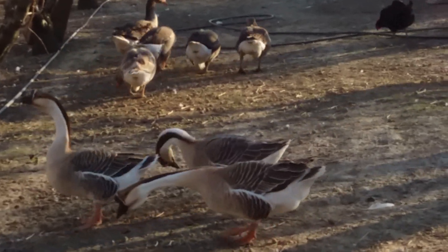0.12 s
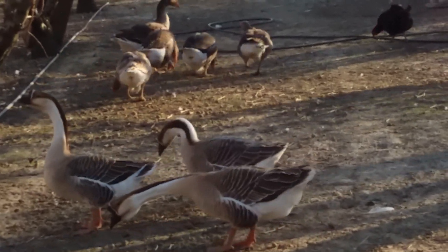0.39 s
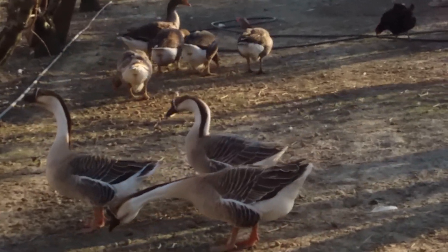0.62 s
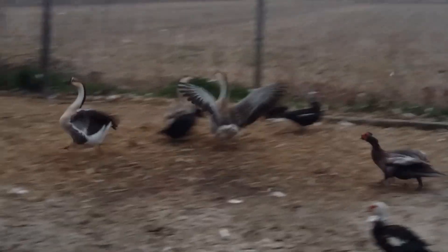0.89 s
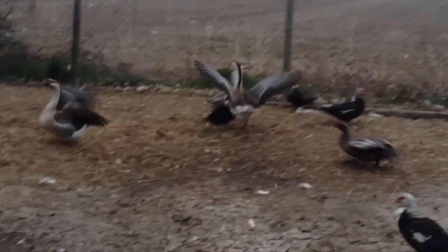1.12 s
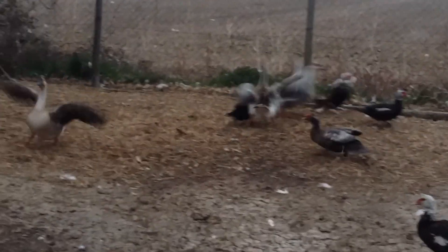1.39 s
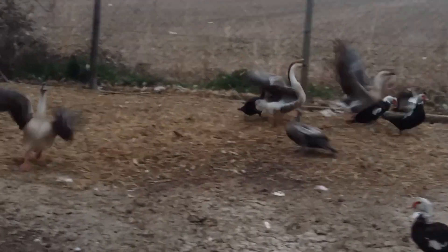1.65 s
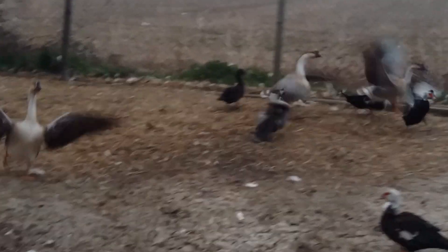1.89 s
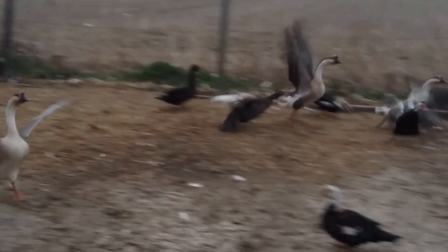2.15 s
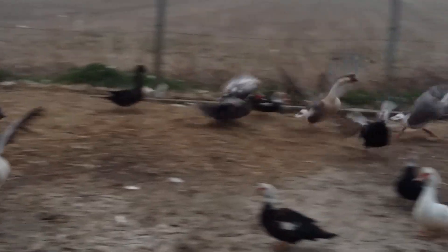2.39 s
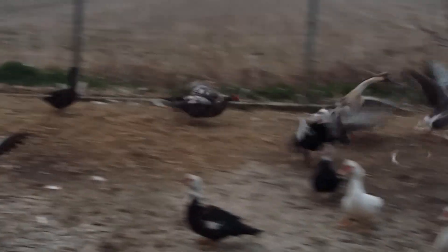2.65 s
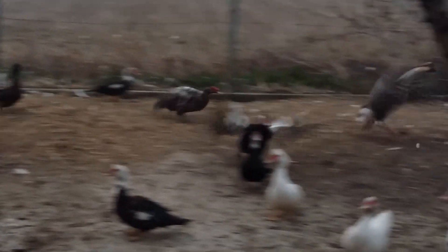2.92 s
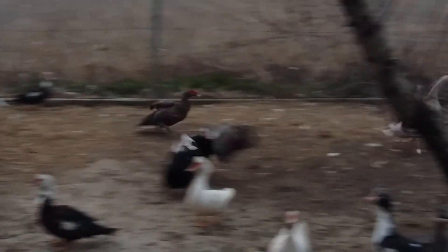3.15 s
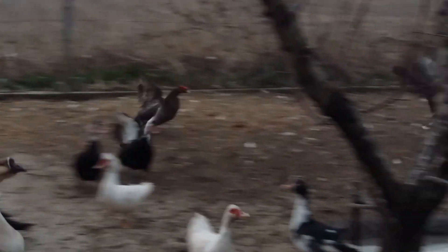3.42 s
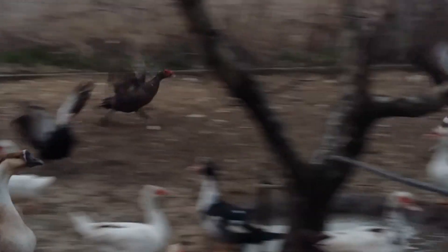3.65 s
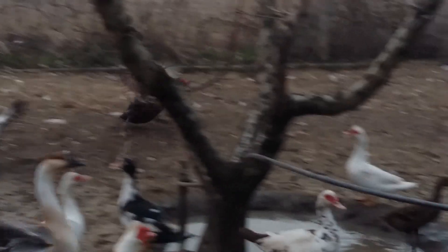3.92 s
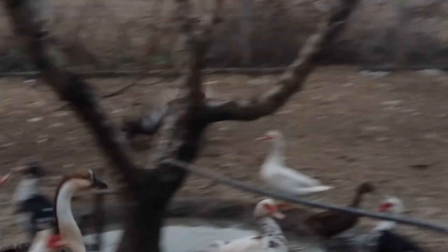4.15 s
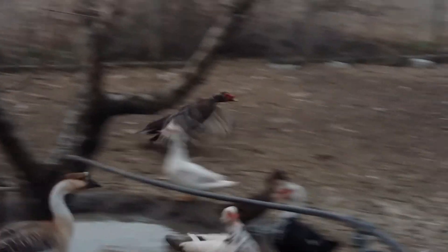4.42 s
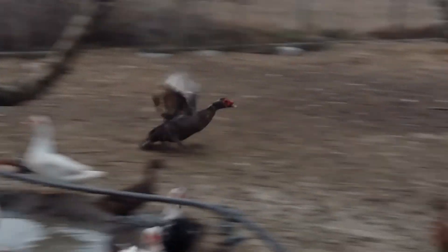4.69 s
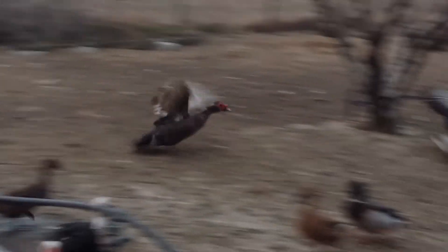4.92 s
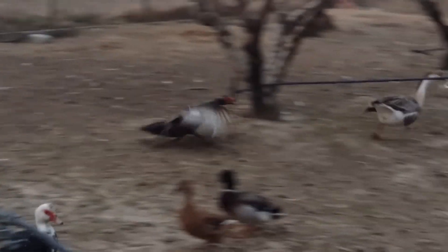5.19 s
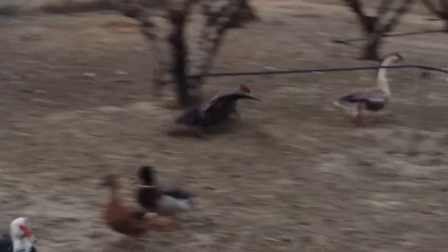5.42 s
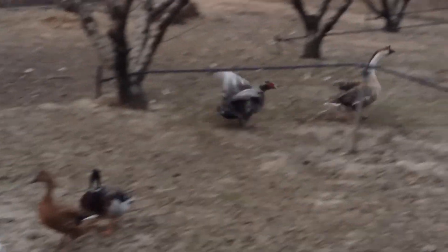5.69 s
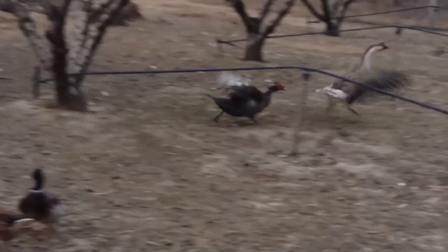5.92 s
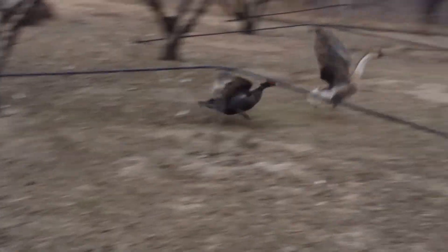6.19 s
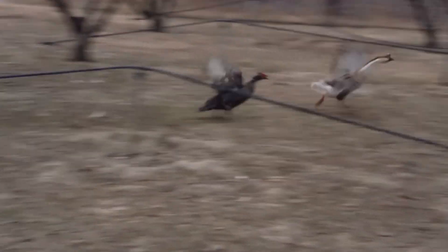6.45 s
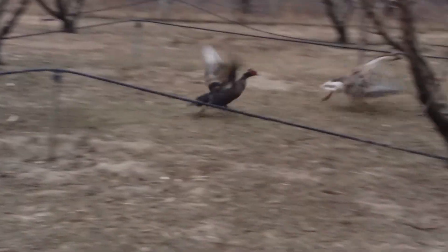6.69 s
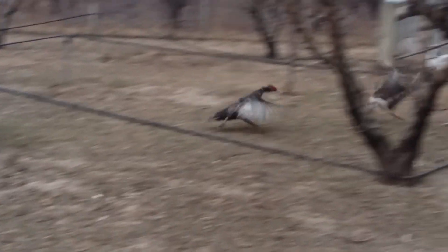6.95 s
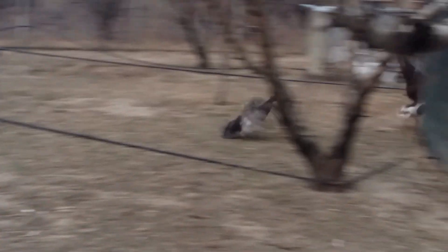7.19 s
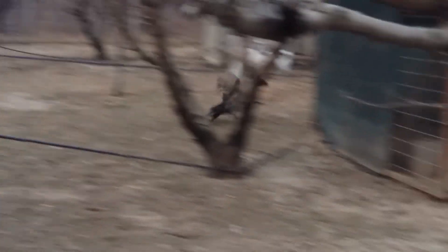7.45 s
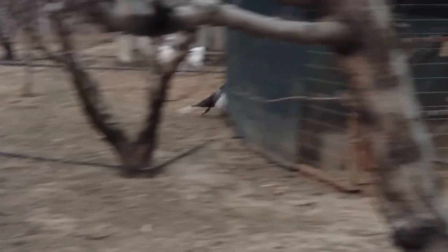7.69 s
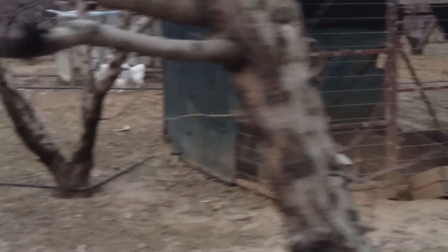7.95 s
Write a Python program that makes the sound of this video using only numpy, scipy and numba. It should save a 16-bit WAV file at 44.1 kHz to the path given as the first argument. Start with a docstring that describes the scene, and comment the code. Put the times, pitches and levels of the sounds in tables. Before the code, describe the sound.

An open farmyard with gusty low wind and soft hush. At 0 s a reedy cry fades into uneven nasal honks at 0.1 and 0.5 s, with thin whistled notes and a faint hoarse honk around 0.4. At about 0.8 s everything cuts to silence, fading back from 1.1 s. Hoarse low honks come at 1.2, 2.2 and, stronger, 3.2 s, with soft wing claps and foot thuds between. From 3.9 to 4.8 s honks crowd together, with faint high hissing bursts and a yodel at 4.8. Loud clear trumpet honks follow near 5.2, 5.7, 6.4 and 7.1 s, each flaring into a short harsh squawk; a piping note glides down at 5.6. Faint dry rasps sit behind, and a thud lands at 6.3. A last yodel and plain honk close around 7.7 to 8.1 s. The left is clear, the right muffled, with low hum until 1.9 s.

```python
"""Thin goose notes, a reedy cry and uneven reedy honks open an open farmyard, over wind and yard hush.
After a third of a second of silence the sound fades back in: hoarse honks overlap, wings and feet thud,
far rasps and thin bursts of high noise join, then clear trumpet honks close by, the first four squawking.
Honks are membrane flaps and breath ringing throat resonances; notes are sine partials; the rest is
shaped noise. Two microphone ports hear it all, the right one muffled."""
import sys
import numpy as np
from scipy import signal
from scipy.fft import rfft, irfft
from scipy.io import wavfile
from scipy.ndimage import uniform_filter1d, minimum_filter1d
from numba import njit

SR = 44100
rng = np.random.default_rng(int(sys.argv[2]) if len(sys.argv) > 2 else 0)


def to_wav(sig):
    """Store sig (one row per channel, or 1-D mono) as 16-bit WAV at the path in sys.argv[1].

    Samples outside -1..1 are clipped; the rate is SR.
    """
    pcm = np.clip(np.atleast_2d(sig), -1, 1) * 32767
    pcm = np.round(pcm).astype(np.int16)
    wavfile.write(sys.argv[1], SR, pcm.T)  # frames by channels


def volts_from_db(level):
    """Convert decibel levels to linear amplitude ratios."""
    exponent = np.asarray(level, float) / 20
    return 10 ** exponent


N = 356328  # samples


def shape(x, points):
    """Minimum-phase filter through (freq_hz, gain_db) points, so nothing sounds ahead of its cause."""
    hz, db = np.transpose(points)
    log_hz = np.log(np.arange(1025) * SR / 2048 + 1)
    cepstrum = irfft(np.interp(log_hz, np.log(hz), db) * np.log(10) / 20)
    # folding the cepstrum forward makes the filter causal
    cepstrum[1:1024] *= 2
    cepstrum[1025:] = 0
    response = irfft(np.exp(rfft(cepstrum)))[:1024]
    return signal.fftconvolve(x, response)[:len(x)]


def unit(x):
    """Scale to rms 1."""
    return x / np.sqrt(np.mean(x ** 2))


def band(x, lo_hz, hi_hz):
    """Steep band-pass."""
    return signal.sosfilt(signal.butter(3, [lo_hz, hi_hz], "band", fs=SR, output="sos"), x)


def walk(rate, size=N):
    """Random levels held 1 / rate s and slewed twice; spread near 1."""
    hold = int(SR / rate)
    steps = np.repeat(rng.standard_normal(size // hold + 1), hold)
    return 1.3 * uniform_filter1d(uniform_filter1d(steps, hold), hold)[:size]


@njit
def svf(x, hz, width):
    """Moving state-variable band-pass, gain 1 at the centre."""
    y, b, l = np.empty(len(x)), 0., 0.
    for i in range(len(x)):
        g, k = np.tan(np.pi * hz[i] / SR), width / hz[i]
        v = (b + g * (x[i] - l)) / (1 + g * (g + k))
        b, l, y[i] = 2 * v - b, l + 2 * g * v, k * v
    return y


def resonance(x, hz, width):
    """Moving throat or bill resonance: the band-pass run twice, at rms 1."""
    return unit(svf(svf(x, hz, width), hz, width))


FAINT_DB = -19.5  # fade at the start and end of a call


def course(length, attack_s, release_s, edge_s):
    """Place in the call -.5 to .5, fade in dB up from and back to faint, and soft ends."""
    t = np.arange(int(length * SR)) / SR
    rising = np.clip(1 - t / attack_s, 0, 1)
    falling = np.clip(1 - (length - t) / release_s, 0, 1)
    ends = np.clip(np.minimum(t, length - t) / edge_s, 0, 1)
    return t / length - .5, FAINT_DB * (rising + falling), ends


def even(s, length, db, hz, low_hz, high_hz, way):
    """Controls of a steady call: it swells in, settles on its pitch and resonances, sags and fades."""
    attack_s, release_s, sag_db, settle_s, *under = way
    u, fade_db, ends = course(length, attack_s, release_s, .0054)
    left = np.exp(-(u + .5) * length / settle_s)
    settling = [f * (1 - share * left) for f, share in zip((hz, low_hz, high_hz), under)]
    return (s, db + sag_db * u + fade_db, fade_db, *settling, ends)


def uneven(rows, high_hz):
    """Controls of a call read from its curve of start_s, pitch_hz, level_db and low_hz."""
    s, hz, db, low_hz = np.transpose(rows)
    length = s[-1] - s[0]
    u, _, ends = course(length, .01, .01, 0.016)
    now = s[0] + (u + .5) * length
    hz, db, low_hz = (np.interp(now, s, curve) for curve in (hz, db, low_hz))
    fade_db = np.minimum(db - np.median(db), 0)
    return s[0], db, fade_db, hz, low_hz, np.full(len(u), 1. * high_hz), ends


def flaps(phase, rough, chance, shimmer_db):
    """One click wherever the phase passes a whole number, shared between two samples, each of its own size."""
    out = np.zeros(len(phase) + 1)
    at = np.flatnonzero(np.diff(np.floor(phase)) > 0) + 1
    late = (phase[at] % 1) / (phase[at] - phase[at - 1])
    size = volts_from_db(shimmer_db * rough[at] * chance[at])
    out[at - 1] += size * late
    out[at] += size * (1 - late)
    return out[:-1]


HIGH_LINGERS, TREBLE_LINGERS = 0.28, 1  # share of the call's fade which each upper band escapes
YELP_S, YELP_WIDTH_S = .032, .014  # the high resonance flares soon after the onset
WAVER, WAVER_DB = .08, 6  # wander of throat resonances (share) and upper levels (dB) at full roughness
BILL_WIDTH_HZ = 800.
# treble colour of every honk: freq_hz [Hz], gain_db [dB, relative]
TREBLE_COLOUR = [(2500, -33.5), (3300, 16), (3700, 12), (4150, 1.5), (4700, -6.5), (5400, -4.5), (6200, -9),
                 (7000, -12), (8500, -22.5), (9500, -52), (12000, -45), (15700, -46.5)]


def honk(controls, bright, throat, voice, roughness, flap, gape_db=0):
    """Membrane flaps and puffs of air ring two moving throat resonances; rougher: more uneven, breathier."""
    weak, width, open_db, base_db = voice
    over_high_db, over_treble_db, bill, yelp_db, breath = bright
    held, onset, onset_s = roughness
    flap_size, flap_place = flap
    s, low_db, fade_db, hz, low_hz, high_hz, ends = controls
    n = len(hz)
    t = np.arange(n) / SR
    high_db = over_high_db + gape_db - HIGH_LINGERS * fade_db
    treble_db = over_treble_db + gape_db - TREBLE_LINGERS * fade_db
    high_db = high_db + yelp_db * np.exp(-((t - YELP_S) / YELP_WIDTH_S) ** 2)
    rough = held + onset * np.exp(-(t / onset_s) ** 2)
    low_hz, high_hz = (f * (1 + WAVER * held * walk(20, size=n)) for f in (low_hz, high_hz))
    high_db, treble_db = (db + WAVER_DB * held * walk(14.9, size=n) for db in (high_db, treble_db))
    phase = np.cumsum(hz * (1 + .06 * rough * walk(150, size=n))) / SR
    chance = rng.standard_normal((3, n))
    clicks = flaps(phase, rough, chance[0], 6)
    clicks += flap_size * flaps(phase + flap_place, rough, chance[1], 6)
    # strong-weak pairing of cycles comes and goes
    pairing = np.clip(weak * (1 + 0.12 * walk(25, size=n)), 0, .9)
    clicks *= 1 + pairing * np.sign(np.sin(np.pi * phase - 1))
    puffs = unit(chance[2] * np.exp(-(phase % 1) / 2.5))
    air = np.sqrt(1 - rough) * unit(clicks) + np.sqrt(rough) * puffs
    # the open throat adds a fixed colour to both resonances
    wide = shape(air, throat)
    low = resonance(air, low_hz, 1. * width) + volts_from_db(open_db) * unit(band(wide, 400, 1487))
    high = resonance(air, high_hz, 2.0 * width) + volts_from_db(open_db) * unit(band(wide, 1970, 3217))
    # the hiss of air shows most in the treble
    breathy = air + breath * (puffs + 0.2 * chance[2][::-1])
    bill_ring = resonance(breathy, np.full(n, 1. * bill), BILL_WIDTH_HZ)
    treble = unit(unit(shape(breathy, TREBLE_COLOUR)) + 0.95 * bill_ring)
    # the windpipe hums the fundamental cleanly under the honk
    base = volts_from_db(base_db) * np.sin(2 * np.pi * phase)
    upper = volts_from_db(high_db) * unit(high) + volts_from_db(treble_db) * treble
    return int(s * SR), ends * volts_from_db(low_db) * (unit(low) + upper + base)


# Settings of each kind of honk, beside its tables below:
# BRIGHT: high throat dB over low, treble dB over low, bill resonance Hz, early yelp dB, breath in the treble
# ROUGH: held roughness 0-1, extra at the onset 0-1, onset s
# FLAP: second flap within each cycle: size 0-1, place in the cycle 0-1
CLEAR_BRIGHT, CLEAR_ROUGH, CLEAR_FLAP = (5.5, -12.5, 3903.5, 4, 2.2), (.04, .55, .05), (.55, .478)
CLEAR_HIGH_HZ = 2400  # held high throat resonance
# clear honks: start_s [s], length_s [s], level_db [dB, relative], pitch_hz [Hz, held],
# low_hz [Hz, held low throat resonance]
CLEAR_HONKS = [(5.229, 0.24, -29, 172, 1233), (5.713, 0.23, -28, 173.9, 1250),
               (6.412, 0.23, -29.5, 173.2, 1245), (7.071, .335, -30.5, 171.6, 1246),
               (7.852, 0.26, -31.5, 171.3, 1228)]
# their open throat: freq_hz [Hz], gain_db [dB, relative]
CLEAR_THROAT = [(300, -26), (400, -38.5), (510, -10), (680, -15.5), (850, -2), (1350, -8), (1540, -9.5),
                (1700, 3.5), (2370, -12), (2610, 16), (3100, -4.5), (3500, -27.5), (5000, -64.5)]
# their voice: weak [0-1, every second cycle weaker], width_hz [Hz, resonance width],
# open_db [dB, open throat], base_db [dB, fundamental]
CLEAR_VOICE = (0.21, 191, 0.5, -19)
# their course: attack_s [s], release_s [s], sag_db [dB], settle_s [s], then how far under their held
# values the pitch, low and high resonance start [shares]
CLEAR_COURSE = (.025, .05, -2.3, .075, .065, -0.17, 0.342)


def clear_honks():
    """Trumpet honks close by: smooth flaps with a strong second flap drive steady, bright resonances."""
    return [honk(even(*row, CLEAR_HIGH_HZ, CLEAR_COURSE), CLEAR_BRIGHT, CLEAR_THROAT, CLEAR_VOICE,
                 CLEAR_ROUGH, CLEAR_FLAP) for row in CLEAR_HONKS]


SQUAWK_HZ, SQUAWK_UPPER_HZ, SQUAWK_UPPER_DB = 2400, 5600, -16.5
# the first four near honks break into a squawk, the last has none:
# start_s [s], length_s [s], level_db [dB, relative]
SQUAWKS = [(5.391, 0.096, -19), (5.885, 0.1, -18.5), (6.583, 0.084, -18.5), (7.333, 0.091, -18)]


def squawk(s, length, db):
    """The bill flies open: quick uneven flaps and breath in a main and a falling upper resonance."""
    n = int(length * SR)
    u = np.arange(n) / n
    chance = rng.standard_normal((2, n))
    phase = np.cumsum(340 * (1 + .15 * walk(300, size=n))) / SR
    air = unit(flaps(phase, np.ones(n), chance[0], 3) + .05 * chance[1])
    main = unit(band(air, SQUAWK_HZ - 300, SQUAWK_HZ + 450))
    falling_hz = SQUAWK_UPPER_HZ * (1 - 0.14 * u)
    upper = unit(svf(svf(air, falling_hz, 1200.0), falling_hz, 690.0)) + 0.33 * unit(band(air, 6500, 7600))
    # fast rise, slower fall
    envelope = volts_from_db(db - 33.0 * u ** 2) * np.minimum(u / 0.16, 1) * np.minimum((1 - u) / 0.23, 1)
    return int(s * SR), envelope * (main + volts_from_db(SQUAWK_UPPER_DB) * upper)


HOARSE_BRIGHT, HOARSE_ROUGH, HOARSE_FLAP = (-6.5, -21, 4399.5, -1.5, 1.5), (.26, .4, .04), (.15, .45)
HOARSE_HIGH_HZ = 1560
# hoarse honks, one curve each: start_s [s], pitch_hz [Hz], level_db [dB, relative],
# low_hz [Hz, low throat resonance]
HOARSE_HONKS = [
    [(.37, 171.3, -36, 910), (.42, 164.2, -39.5, 900), (.5, 167.7, -40.5, 950)],
    [(1.21, 160, -49, 1450), (1.258, 144.5, -42.5, 1270), (1.458, 164, -35, 1280),
     (1.502, 146.7, -36, 1300), (1.58, 159, -55, 1060)],
    [(2.19, 169.6, -51.5, 1150), (2.3, 144.7, -36.5, 1040), (2.428, 155.9, -35.5, 915),
     (2.556, 153.2, -34.5, 960), (2.61, 159, -54, 1230)],
    [(3.14, 159, -60, 1020), (3.16, 178.6, -34.5, 1020), (3.258, 178.4, -41.5, 1060),
     (3.29, 173.3, -36, 1570), (3.342, 147.1, -32, 1250), (3.618, 163.2, -26.5, 1273),
     (3.68, 175.9, -45, 1200)],
    [(3.9, 172.7, -40, 866), (3.93, 166, -35.5, 790), (4.01, 177, -32.5, 910), (4.06, 170, -59, 1200)],
    [(4.16, 148.2, -39.5, 1490), (4.208, 161.1, -30, 1620), (4.29, 154.4, -34, 1480),
     (4.384, 149.9, -28.5, 1310), (4.43, 151.3, -55, 880)],
    [(4.43, 166.5, -41, 780), (4.484, 147.2, -40, 800), (4.5, 158, -50, 910)],
    [(4.5, 153.3, -38, 990), (4.554, 180.8, -27, 1120), (4.708, 175, -39, 936), (4.772, 141.6, -35.5, 1040),
     (4.84, 156.4, -38.5, 1369)],
    [(5.53, 177, -46, 1340), (5.558, 166, -32, 1460), (5.62, 166.6, -42.5, 1500)],
]
# how wide the bill gapes in each hoarse honk: gape_db [dB on the upper bands]
GAPES = [5, 2, 2.5, -2, 1.5, 0.5, 3.5, 2, 2.5]
# their open throat: freq_hz [Hz], gain_db [dB, relative]
HOARSE_THROAT = [(300, -51), (450, -19.5), (700, -0.5), (1070, 0), (1650, 1.5), (2300, -12), (2750, -1),
                 (3300, -49.5), (5000, -75)]
# their voice: weak [0-1], width_hz [Hz], open_db [dB], base_db [dB]
HOARSE_VOICE = (0.2, 203, -2, -13.5)


def hoarse_honks():
    """Uneven flaps and much breath; pitch, level and throat follow a curve."""
    return [honk(uneven(rows, HOARSE_HIGH_HZ), HOARSE_BRIGHT, HOARSE_THROAT, HOARSE_VOICE,
                 HOARSE_ROUGH, HOARSE_FLAP, gape_db) for rows, gape_db in zip(HOARSE_HONKS, GAPES)]


REEDY_BRIGHT, REEDY_HIGH_HZ = (-9, -14, 3201.5, 1.5, 2.5), 1640
# reedy honks, one curve each: start_s [s], pitch_hz [Hz], level_db [dB, relative],
# low_hz [Hz, low throat resonance]
REEDY_HONKS = [
    [(.12, 169.1, -50, 1260), (.158, 163.2, -32, 1180), (.192, 171.3, -32.5, 1044),
     (.346, 166.2, -29.5, 893), (.38, 164, -46, 1040)],
    [(.49, 167.6, -40.5, 1010), (.59, 167, -31, 1050), (.68, 167, -34, 992), (.75, 160.1, -43, 980),
     (.78, 157, -60.5, 1036)],
]
# their open throat: freq_hz [Hz], gain_db [dB, relative]
REEDY_THROAT = [(300, -40.5), (500, -16), (840, -17), (1000, -7.5), (1350, -4), (1700, 10), (2100, -23),
                (2700, -4.5), (3300, -38), (5000, -49.5)]
# their voice: weak [0-1], width_hz [Hz], open_db [dB], base_db [dB]
REEDY_VOICE = (0.22, 188, 1.5, -22)


def reedy_honks():
    """Uneven curves as in the hoarse honks, with the low held roughness of the clear ones."""
    return [honk(uneven(rows, REEDY_HIGH_HZ), REEDY_BRIGHT, REEDY_THROAT, REEDY_VOICE,
                 CLEAR_ROUGH, HOARSE_FLAP) for rows in REEDY_HONKS]


def note(s, hz, multiples, levels, ends):
    """A nearly pure call: a few strong partials of one wavering pitch, faint others, a husky flutter on all."""
    n = len(hz)
    phase = 2 * np.pi * np.cumsum(hz * (1 + .003 * walk(60, size=n))) / SR
    strong = sum(volts_from_db(db) * np.sin(k * phase) for k, db in zip(multiples, levels))
    others = [k for k in range(2, int(6500 / hz.max())) if k not in multiples and k * hz.min() > 600]
    overtones = sum(volts_from_db(-6 * k * hz / 1000 + 6 * walk(25, size=n)) * np.sin(k * phase) for k in others)
    # air leaks past the membranes once a cycle
    leak = rng.standard_normal(n) * (1 + np.sin(phase))
    breath = unit(shape(leak, HOARSE_THROAT[:-1] + TREBLE_COLOUR[-1:]))
    faint = volts_from_db(np.max(levels, axis=0) - 16.5) * (overtones + 0.46 * breath)
    flutter = 1 + 0.18 * walk(380, size=n)
    return int(s * SR), ends * np.sqrt(2) * (strong + faint) * flutter


NOTE_ATTACK, NOTE_RELEASE = 0.46, 0.74  # shares of the length
# partials of a thin note: multiple [of the pitch], level_db [dB, relative]
NOTE_PARTIALS = [(1, 0), (2, -18), (3, -28)]
# thin notes: start_s [s], length_s [s], level_db [dB, relative], from_hz [Hz], to_hz [Hz]
THIN_NOTES = [(.42, .11, -28, 1010, 985), (.385, .09, -31, 840, 880), (3.22, .055, -26, 1090, 1085),
              (3.912, .13, -29, 850, 875), (3.99, .08, -31, 1310, 1290), (5.565, .175, -19, 1495, 1410),
              (5.6, .12, -42, 2310, 2230), (5.55, .15, -33, 845, 805)]


def thin(s, length, db, from_hz, to_hz):
    """One gliding tone that swells and fades roundly."""
    u, fade_db, ends = course(length, NOTE_ATTACK * length, NOTE_RELEASE * length, .012)
    multiples, partial_db = zip(*NOTE_PARTIALS)
    round_db = db + fade_db ** 2 / FAINT_DB
    pitch = from_hz + (to_hz - from_hz) * (u + .5) ** 1.5
    return note(s, pitch, multiples, [round_db + p for p in partial_db], ends)


YODEL_FROM_HZ, YODEL_TO_HZ, YODEL_CLIMB_S, YODEL_WIDTH_HZ = 850, 1400, .045, 150
YODEL_OCTAVE_DB, YODEL_GLIDE = -7, .02  # octave resonance once climbed; rise in pitch as a share
# yodels: start_s [s], length_s [s], level_db [dB, relative], pitch_hz [Hz, mid-call]
YODELS = [(4.784, 0.17, -29, 223.3), (7.729, 0.19, -33.5, 228.2)]


def yodel(s, length, db, hz):
    """The climbing resonance picks out the multiples nearest to it; its octave comes in late."""
    u, fade_db, ends = course(length, 0.027, 0.062, .012)
    climb = 1 - np.exp(-(u + .5) * length / YODEL_CLIMB_S)
    pitch = hz * (1 + YODEL_GLIDE * u)
    centre = YODEL_FROM_HZ + (YODEL_TO_HZ - YODEL_FROM_HZ) * climb
    octave = (volts_from_db(YODEL_OCTAVE_DB) * climb ** 5) ** 2

    def near(f, c):
        return np.exp(-((f - c) / YODEL_WIDTH_HZ) ** 2)

    multiples = range(int(700 / hz) + 1, int(3000 / hz))
    powers = [near(k * pitch, centre) + octave * near(k * pitch, 2 * centre) + 0.0011 for k in multiples]
    return note(s, pitch, multiples, [db + fade_db + 10 * np.log10(p) for p in powers], ends)


# opening cry: length_s [s], level_db [dB, relative], from_hz [Hz], to_hz [Hz]
CRY = (0.27, -36.5, 396, 401.5)
# its partials: multiple [of the pitch], level_db [dB, relative]
CRY_PARTIALS = [(2, -9), (3, 0), (5, -12), (6, -7), (9, -16)]


def cry():
    """A reedy stack that is loudest at once and dies away, its higher partials by more."""
    length, db, from_hz, to_hz = CRY
    u, fade_db, ends = course(length, .002, 0.14, .004)
    multiples = [k for k, _ in CRY_PARTIALS]
    levels = [db + p + fade_db * k / 5 for k, p in CRY_PARTIALS]
    return note(0, from_hz + (to_hz - from_hz) * (u + .5), multiples, levels, ends)


# wing claps and footfalls: start_s [s], peak_db [dB, relative], ring_hz [Hz],
# crack_db [dB over the thud], crack_hz [Hz]
THUDS = [(1.369, -38, 1320, -14, 1320), (1.799, -46.5, 240, 3, 1750), (1.863, -32, 164, -6.5, 1560),
         (1.958, -50, 175, -9, 1880), (2.034, -35.5, 188, -3, 1040), (2.139, -38, 196, 4.5, 920),
         (2.743, -29.5, 151, -3, 1640), (2.96, -45, 266, 8, 1580), (3.852, -32.5, 167, -13, 1340),
         (6.27, -29, 420, -10, 2330), (6.969, -41, 1390, -3, 1390)]


def thud(s, peak_db, hz, crack_db, crack_hz):
    """A soft blow of air with a short rustling crack."""
    t = np.arange(int(.06 * SR)) / SR
    noise = rng.standard_normal((2, len(t)))
    blow = unit(band(noise[0], .5 * hz, 2 * hz)) * np.exp(-t / 0.011)
    crack = unit(band(noise[1], 0.15 * crack_hz, 2 * crack_hz)) * np.exp(-t / 0.0096)
    # 7 dB lower, since the noise peaks above its rms
    return int(s * SR), volts_from_db(peak_db - 7) * np.minimum(t / .001, 1) * (blow + volts_from_db(crack_db) * crack)


RASP_BRIGHT, RASP_ROUGH, RASP_FLAP = (4.5, -14, 4099, -1, 5), (.55, .2, .03), (.05, .45)
RASP_HZ = 97.6  # held pitch
# far rasps: start_s [s], length_s [s], level_db [dB, relative], low_hz [Hz, low resonance],
# high_hz [Hz, high resonance]
RASPS = [(2.83, .1, -57, 1160, 1660), (4.08, 0.064, -53, 1570, 1700), (5.001, .21, -49, 756, 2110),
         (6.04, 0.087, -49, 1510, 1890), (6.155, .195, -47.5, 840, 2360), (6.631, .34, -47.5, 1500, 2080),
         (7.472, 0.092, -55.5, 1200, 2000), (5.448, 0.098, -50, 1180, 2180), (7.587, .09, -61, 1427, 1430)]
# their open throat: freq_hz [Hz], gain_db [dB, relative]
RASP_THROAT = [(260, -63), (450, -48), (556, -17), (693, -6.5), (807, -2.5), (1930, 25), (3400, -12),
               (4420, -84), (7480, -120)]
# their voice: weak [0-1], width_hz [Hz], open_db [dB], base_db [dB]
RASP_VOICE = (0.2, 240.5, -9, -36)
# their course: attack_s [s], release_s [s], sag_db [dB], settle_s [s], then the starts of pitch, low and
# high resonance under their held values [shares, negative above]
RASP_COURSE = (0.026, 0.023, -.8, .05, -.04, 0.12, 0.03)


def far_rasps():
    """Slow, very rough flaps, more breath than tone."""
    return [honk(even(s, length, db, RASP_HZ, low_hz, high_hz, RASP_COURSE), RASP_BRIGHT, RASP_THROAT,
                 RASP_VOICE, RASP_ROUGH, RASP_FLAP) for s, length, db, low_hz, high_hz in RASPS]


BURST_LO_HZ, BURST_HI_HZ = 7350, 10160
# thin bursts of high noise: start_s [s], length_s [s], level_db [dB, relative]
HIGH_BURSTS = [(3.501, 0.19, -70.5), (3.904, .17, -64), (4.159, 0.082, -67.5), (4.32, .18, -65.5),
               (4.668, 0.17, -64.5), (5.044, 0.13, -63), (6.168, 0.18, -68)]


def high_burst(s, length, db):
    """A thin flickering burst of high noise, 7 to 10 kHz."""
    u, fade_db, ends = course(length, 0.056, 0.053, 0.012)
    level_db = db + .5 * fade_db + 2.5 * walk(60, size=len(u))
    noise = unit(band(rng.standard_normal(len(u)), BURST_LO_HZ, BURST_HI_HZ))
    return int(s * SR), ends * volts_from_db(level_db) * noise


DROP_S, BACK_S, FADE_S = .772, 1.095, 0.24  # silence begins, ends, and the fade back in
HUM_HZ, HUM_DB, HUM_END_S = 45, -45, 1.94
# background course: start_s [s], wind_db [dB, relative], hush_db [dB, relative]
AIR_COURSE = [(0.0, -48.5, -52.5), (.25, -59, -44), (.446, -41.5, -59.5), (.74, -55.5, -40),
              (1.27, -52, -65.5), (1.89, -48.5, -59.5), (3.87, -49, -58), (4.15, -48.5, -52.5),
              (4.45, -48.5, -47), (4.85, -61, -56), (5.78, -61.5, -56.5), (7.87, -57.5, -57),
              (8.08, -72, -57.5)]
# wind colour: freq_hz [Hz], gain_db [dB, relative]
WIND_COLOUR = [(25, -30.5), (36, -21.5), (46, -2), (80, 1.5), (184, -2.5), (312, -6.5), (500, -16),
               (700, -44), (1100, -100)]
# yard hush colour: freq_hz [Hz], gain_db [dB, relative]
HUSH_COLOUR = [(100, -10.5), (200, -14), (300, -11.5), (450, -13), (900, -3.5), (1400, -11), (2000, -13),
               (3000, -21), (4000, -24), (6000, -30.5), (9000, -41.5), (13000, -46.5), (15700, -41)]


def yard_air():
    """Gusty wind, partly the right port's own, the flickering hush of the yard, and a low hum at right."""
    t = np.arange(N) / SR
    s, wind_db, hush_db = np.transpose(AIR_COURSE)
    shared, own = (unit(shape(rng.standard_normal(N), WIND_COLOUR)) * volts_from_db(2.1 * walk(9)) for _ in range(2))
    noise = shape(rng.standard_normal(N), HUSH_COLOUR)
    octaves = [band(noise, f, 2 * f) * volts_from_db(2.0 * walk(12)) for f in 125 * 2. ** np.arange(7)]
    swell_db = np.interp(t, s, hush_db)
    # the far treble hiss does not follow the short swells
    calm_db = minimum_filter1d(swell_db[::-1], size=SR)
    calm_db = uniform_filter1d(calm_db, size=SR // 4)[::-1].clip(-62, 0)
    hush = volts_from_db(swell_db) * sum(octaves[:4]) + volts_from_db(calm_db + 1.5) * sum(octaves[4:])
    hush = hush / np.std(noise)
    gust = volts_from_db(np.interp(t, s, wind_db))
    hum = volts_from_db(HUM_DB) * np.sin(2 * np.pi * HUM_HZ * t)
    hum = hum * np.clip((HUM_END_S - t) / 0.042, 0, 1) * (t > BACK_S)
    return volts_from_db(4.0) * gust * shared + volts_from_db(13.0) * hush, volts_from_db(-1.5) * gust * own + hum


# muffling of the right port: freq_hz [Hz], loss_db [dB]
MUFFLE = [(60, 21.5), (94, 6.5), (150, 6), (230, 9), (360, 10.5), (570, 12.5), (890, 12), (1390, 22.5),
          (2180, 32), (3410, 28)]


def scene():
    """All birds with a faint echo from the sheds, heard by an open left port and a muffled right one."""
    sounds = clear_honks() + hoarse_honks() + reedy_honks() + far_rasps() + [cry()]
    for play, rows in ((squawk, SQUAWKS), (thin, THIN_NOTES), (yodel, YODELS), (thud, THUDS),
                       (high_burst, HIGH_BURSTS)):
        sounds += [play(*row) for row in rows]
    birds = np.zeros(2 * N)
    for start, sound in sounds:
        birds[start:start + len(sound)] += sound
    birds = birds[:N]
    t = np.arange(int(.3 * SR)) / SR
    echoes = band(rng.standard_normal((2, len(t))), 210, 2700) * np.exp(-t / 0.024) * (t > .006)
    # each port gets its own echo
    heard = [birds + volts_from_db(db) * signal.fftconvolve(birds, echo / np.sqrt(np.sum(echo ** 2)))[:N]
             for echo, db in zip(echoes, (-21, -11))]
    shared, own = yard_air()
    left = volts_from_db(7.5) * heard[0] + shared
    muffled = shape(volts_from_db(5.5) * heard[1] + shared, [(f, -loss_db) for f, loss_db in MUFFLE])
    right = np.roll(muffled, 20)  # 20 samples later than the left
    self_noise = volts_from_db(-72.5) * unit(band(rng.standard_normal(N), 300, 15500))
    return np.array([left, right + own + self_noise])


def band_limit(x):
    """A steep low-pass at the top of the band."""
    return signal.sosfilt(signal.butter(12, 15760, fs=SR, output="sos"), x)


def record(dry):
    """The loudest peaks round off; the sound drops out briefly and fades back in."""
    t = np.arange(N) / SR
    drop = np.clip((DROP_S - t) / .006, 0, 1)
    back = np.clip((t - BACK_S) / FADE_S, 0, 1) ** 1.5
    gate = np.where(t < 1, drop, back)
    mix = .95 * np.tanh(dry / .95) * gate
    return band_limit(mix)


dry = scene()
out = record(dry)
to_wav(out)
```